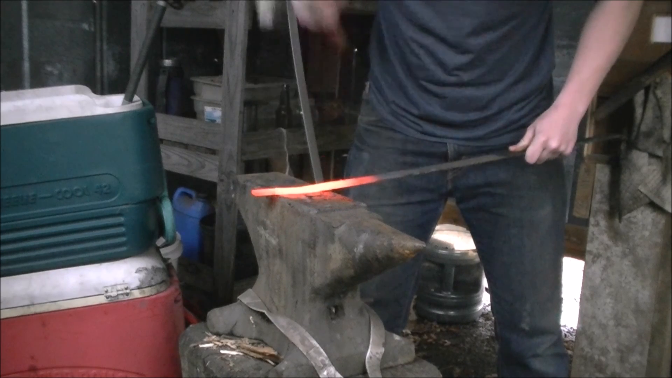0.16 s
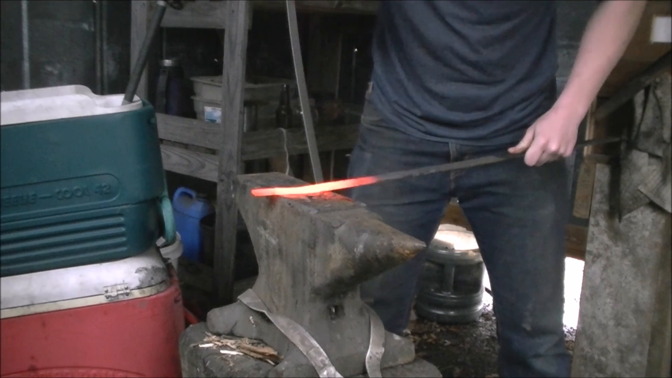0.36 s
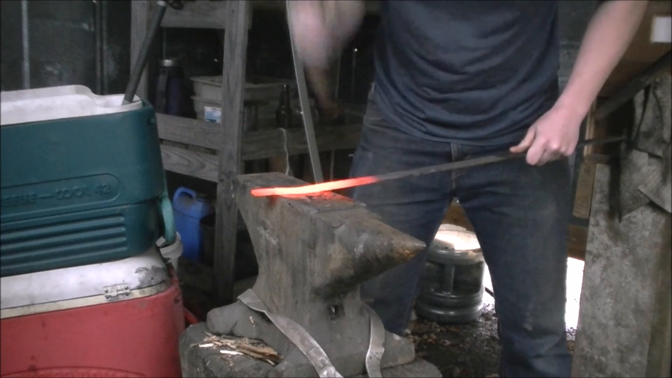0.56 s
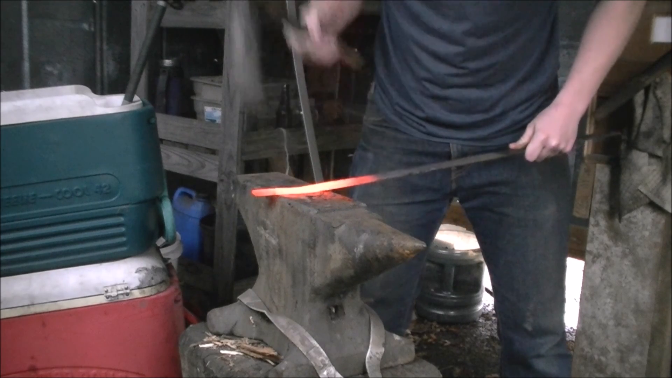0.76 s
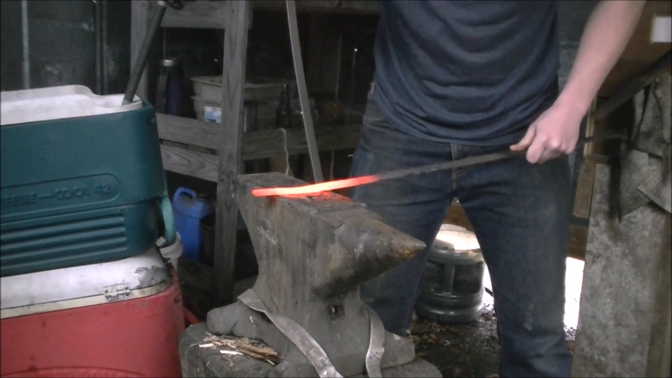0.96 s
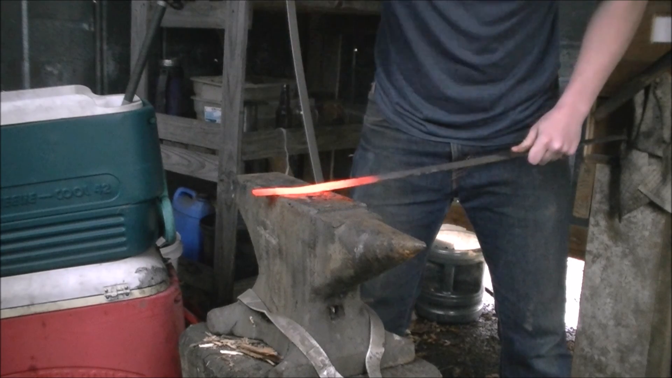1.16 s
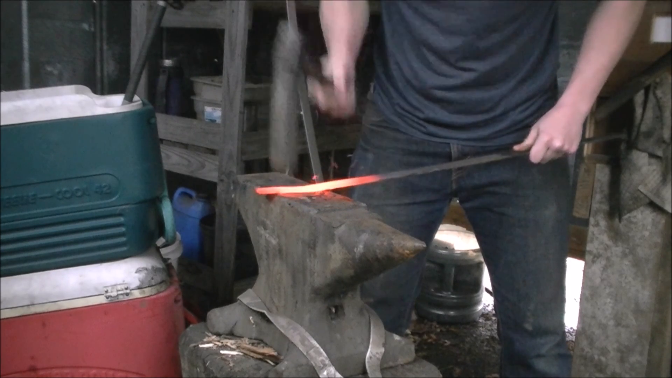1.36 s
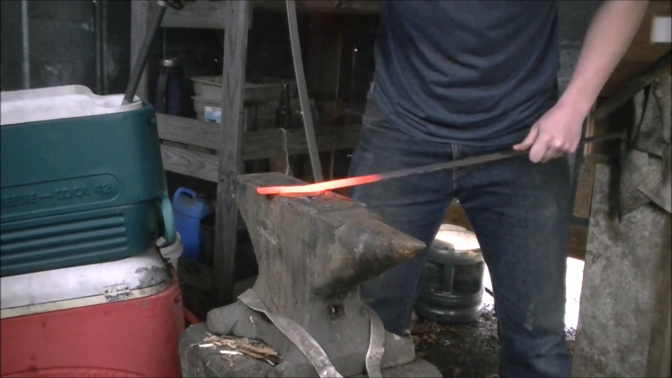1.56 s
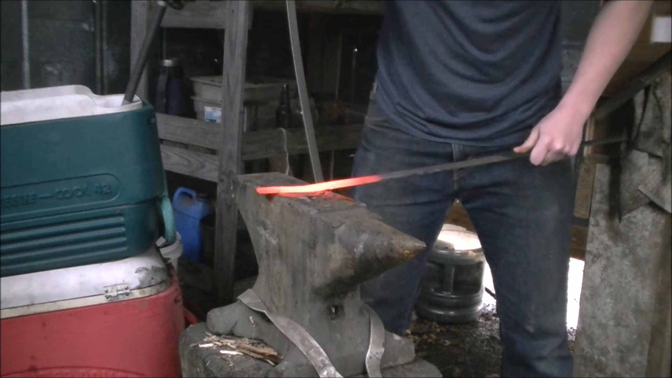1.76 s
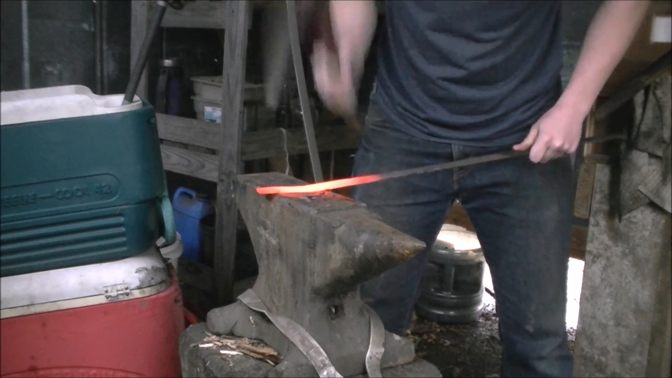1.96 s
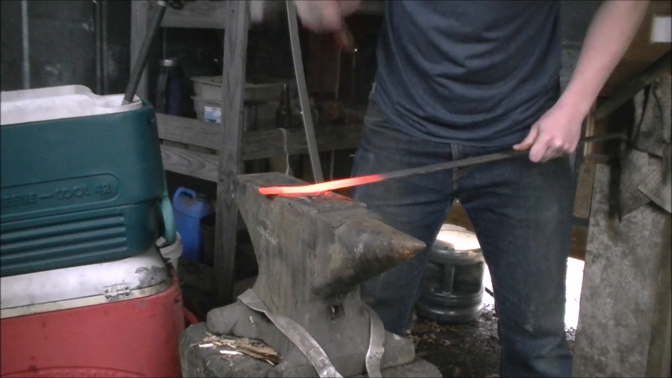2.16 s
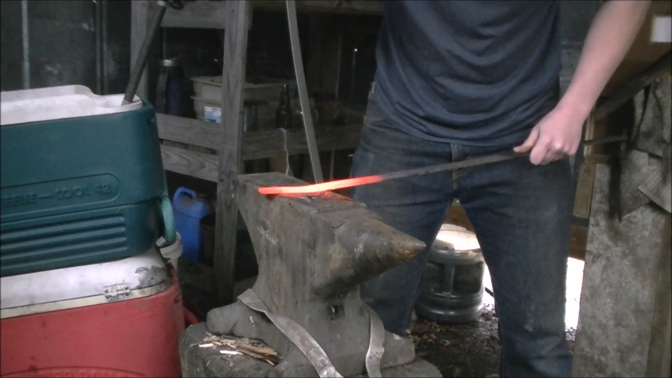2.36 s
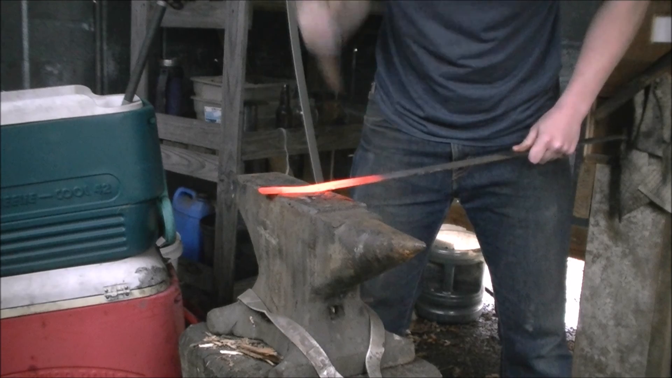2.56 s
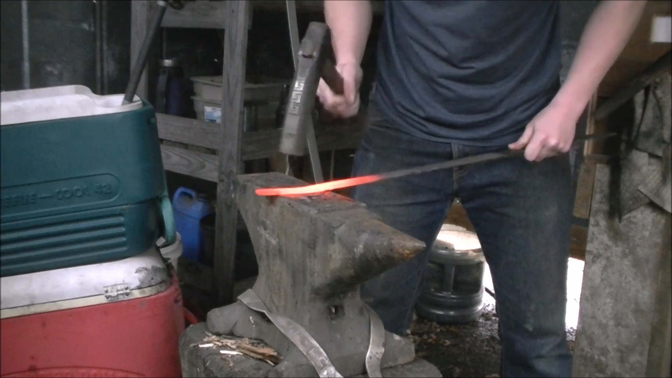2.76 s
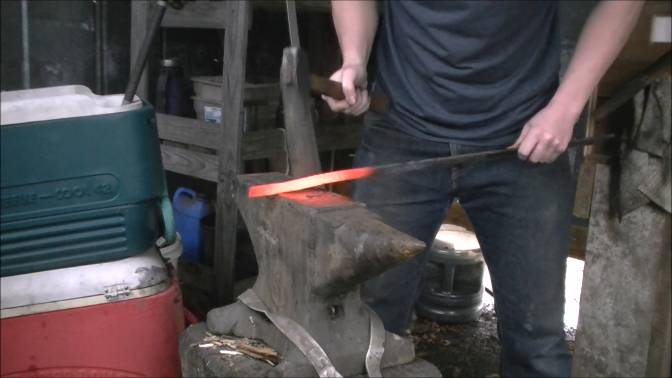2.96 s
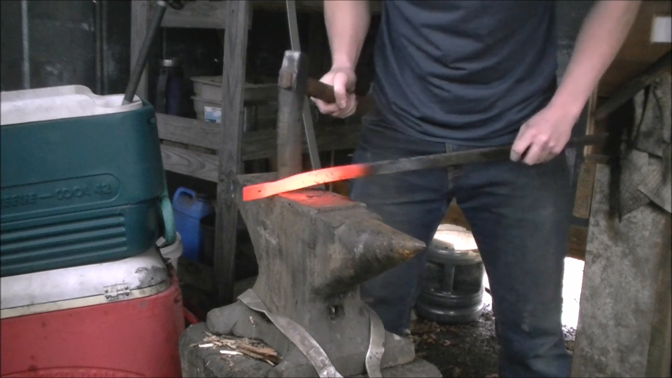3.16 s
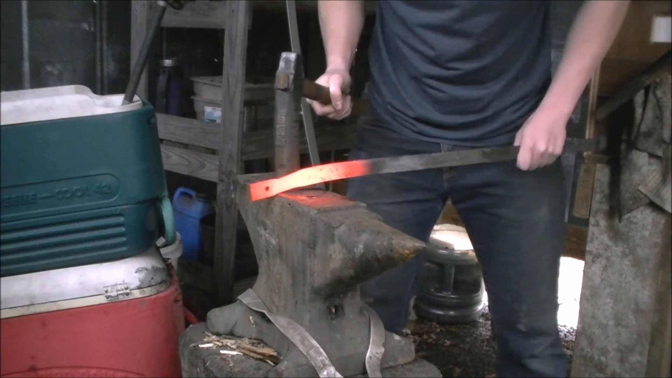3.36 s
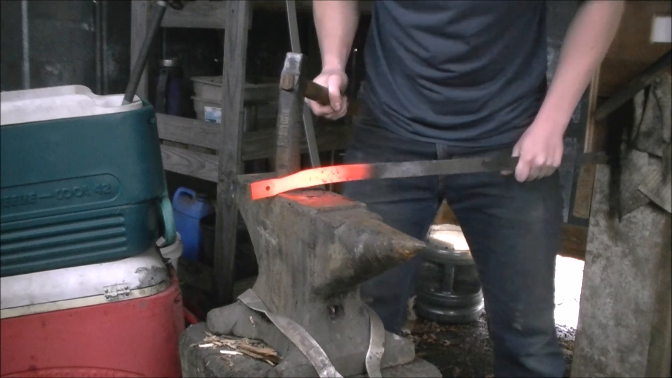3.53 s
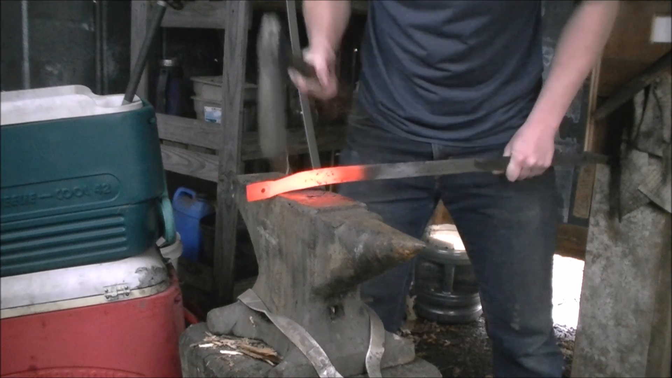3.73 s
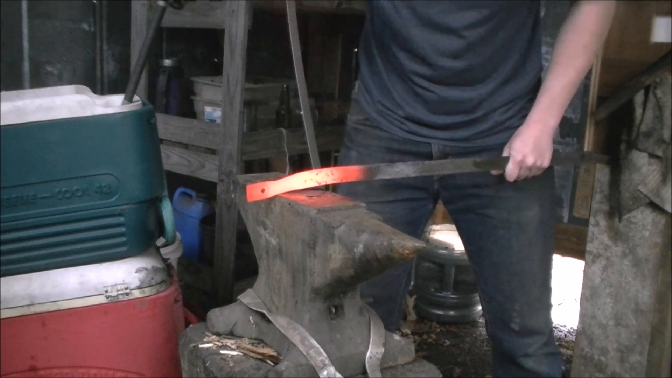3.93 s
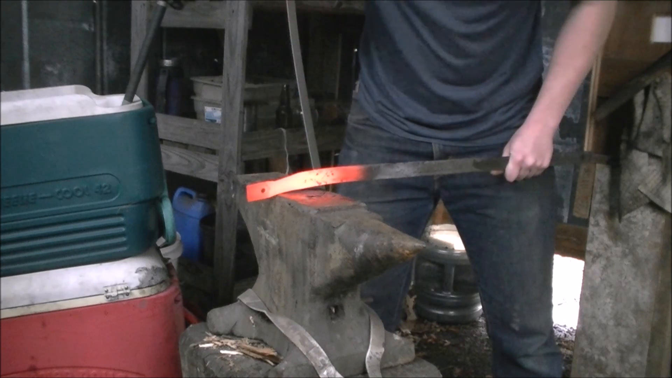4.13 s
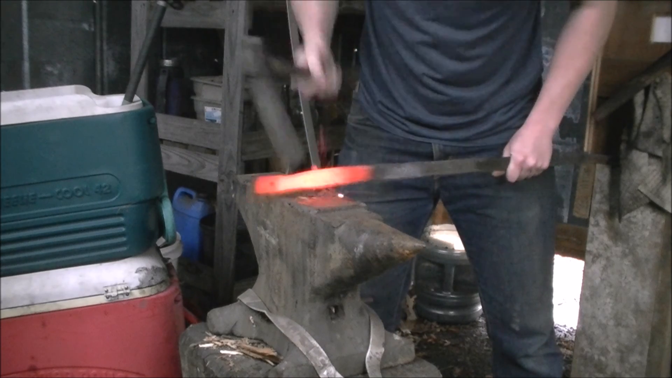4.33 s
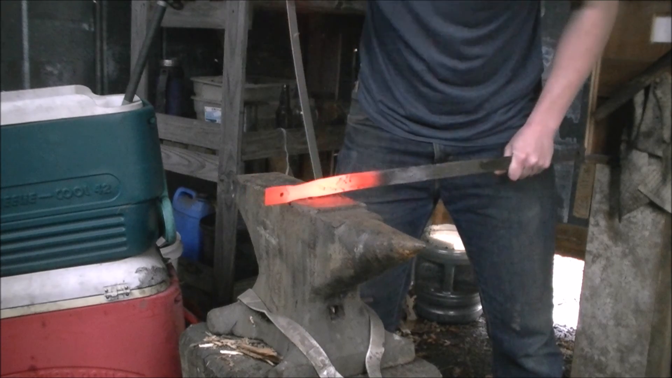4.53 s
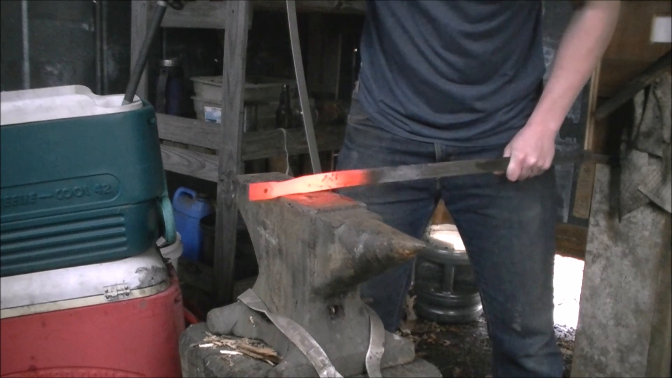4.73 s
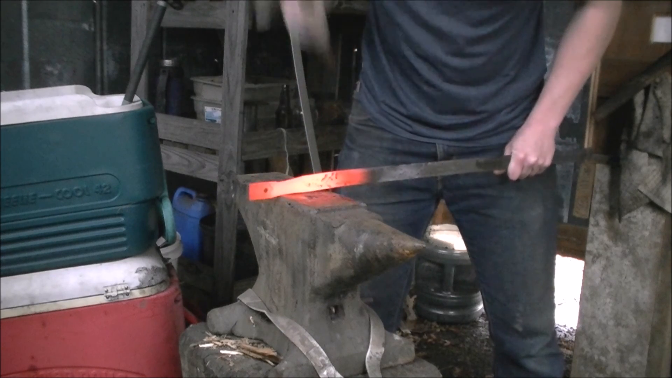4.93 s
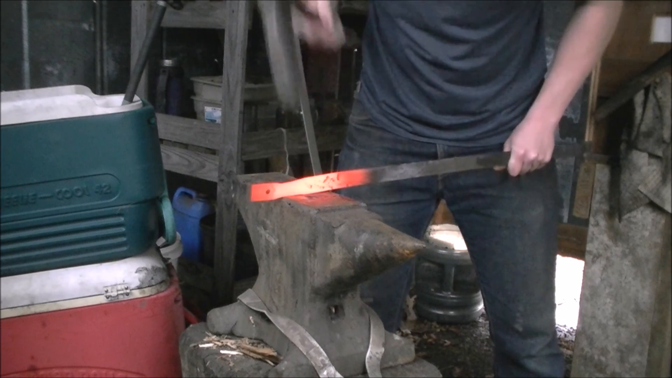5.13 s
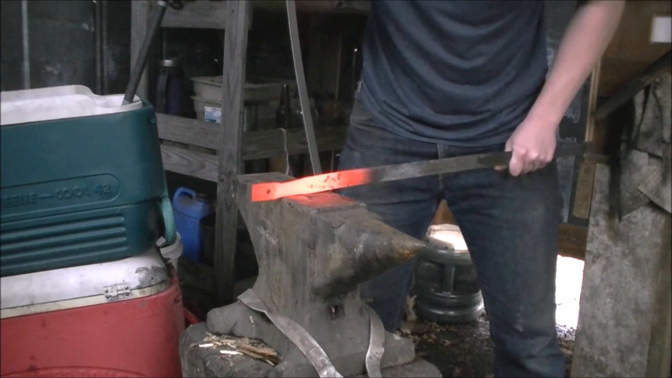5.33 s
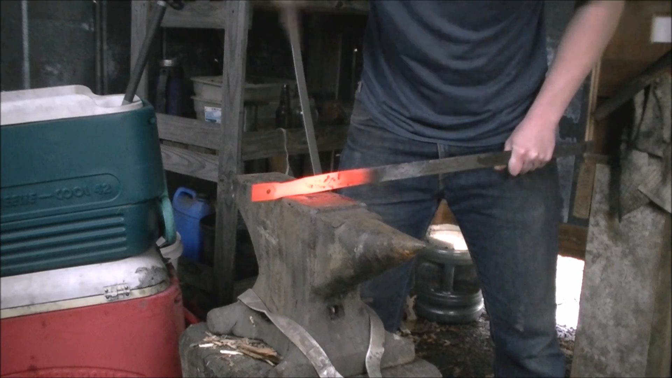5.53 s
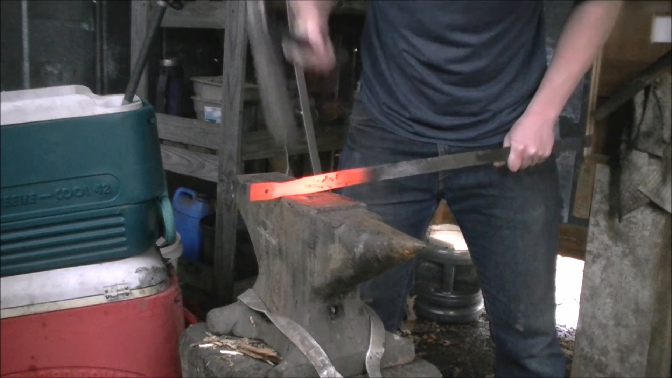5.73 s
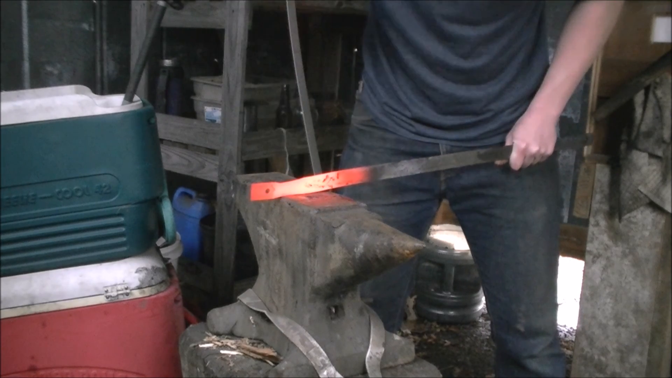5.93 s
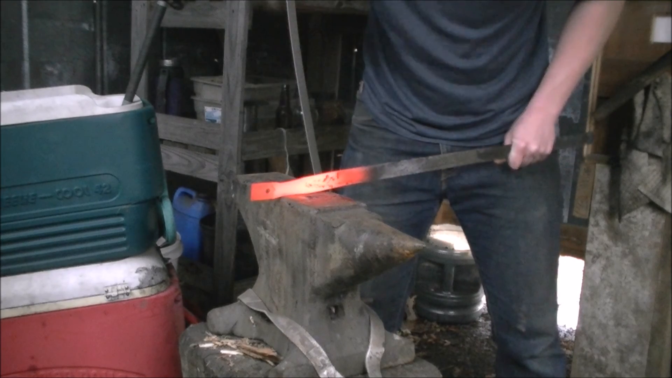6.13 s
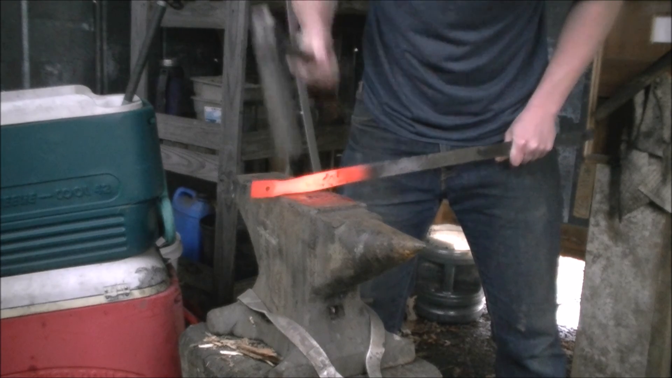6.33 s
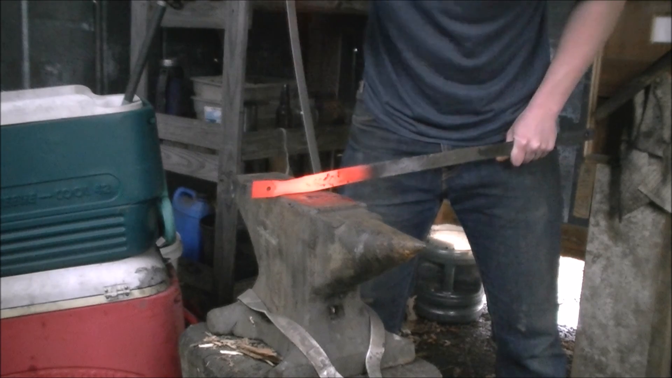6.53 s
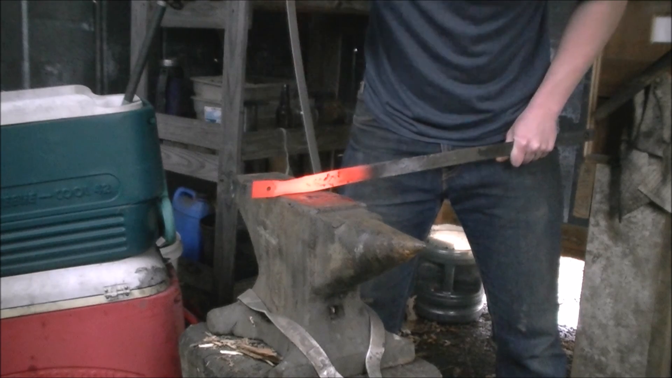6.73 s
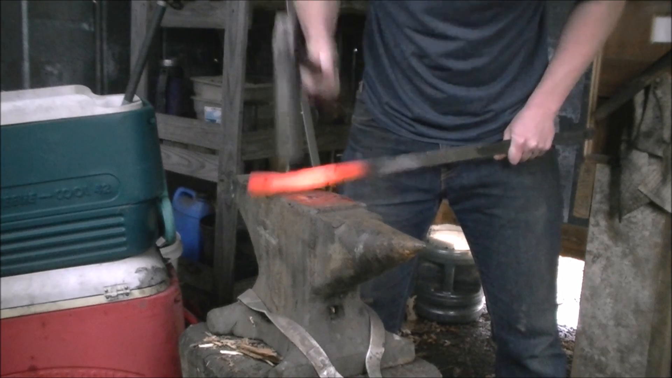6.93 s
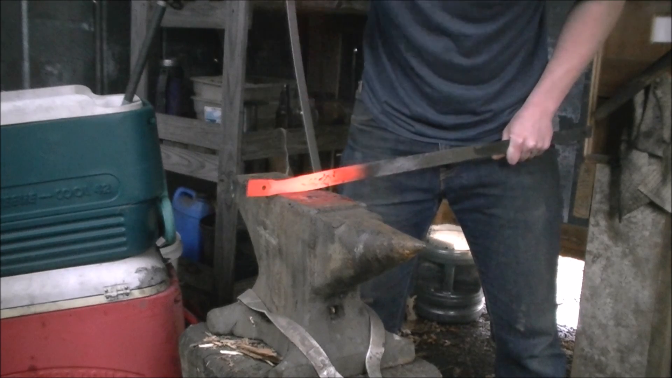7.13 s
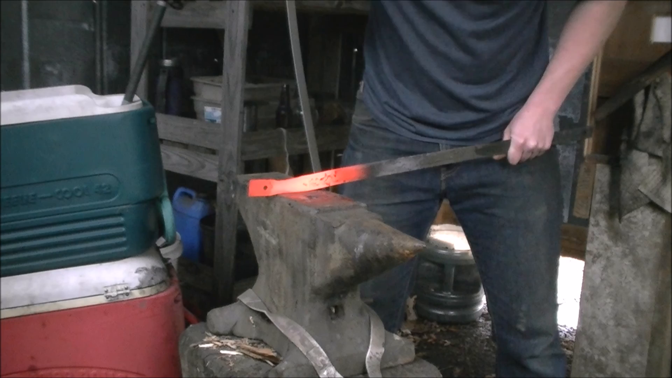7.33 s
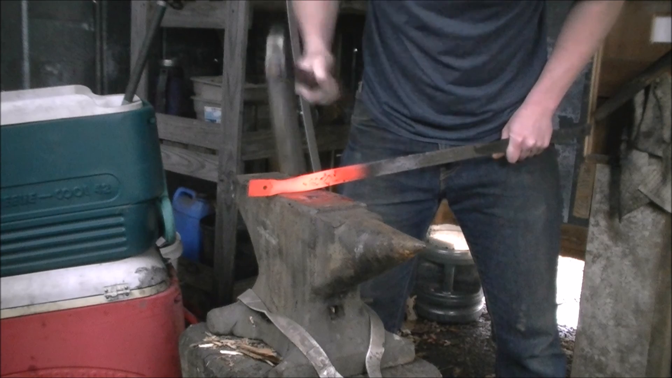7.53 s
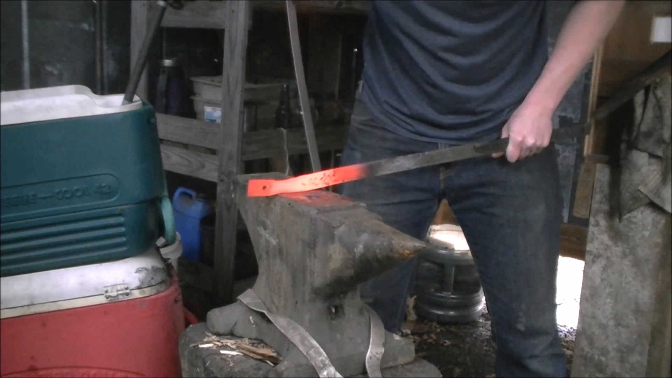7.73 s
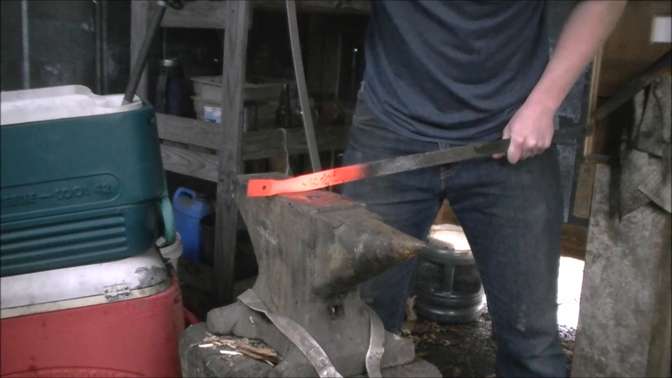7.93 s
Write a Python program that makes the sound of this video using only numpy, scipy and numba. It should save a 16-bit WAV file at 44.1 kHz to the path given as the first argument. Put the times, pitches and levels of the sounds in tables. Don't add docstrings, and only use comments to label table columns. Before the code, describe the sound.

Forging heard from a metre or two: sharp, slightly clipped hammer cracks with bright short steel ringing and a steady pitched hum between them. Heavy hits first, then light pinging taps and a pause of tiny ticks, then thuddier blows, one preceded by a soft metallic knock. Dense short echoes off boards, faint cloth swishes, a quiet forge murmur and a few muffled distant bangs.

```python
import sys
import numpy as np
from scipy import signal
from scipy.fft import rfft, irfft, next_fast_len
from scipy.io import wavfile
from scipy.ndimage import uniform_filter1d
from numba import njit

SR = 44100
rng = np.random.default_rng(int(sys.argv[2]) if len(sys.argv) > 2 else 0)


def transcribe(u):
    v = np.clip(np.atleast_2d(u).T, -1, 1)
    q = np.round(v * 32767).astype(np.int16)
    wavfile.write(sys.argv[1], SR, q)


def to_linear_factor(level_db):
    exponent = np.asarray(level_db, float) / 20
    return 10 ** exponent


N = 356769

# t/s, force level/dB, low tone level/dB, edge ring level/dB, face ring level/dB
BLOWS = [
    [(.003, -10, -26.5, 9, -5), (.658, -10, -27, 6, 9.5), (1.345, -5.5, -27, 8.5, 4),
     (2.022, -7, -29, 9.5, 7.5), (2.673, -12, -30, 5.5, 8)],
    [(2.952, -24.5, -35, 14.5, 11), (3.168, -25.5, -56.5, 14.5, 2.5), (3.264, -32, -44.5, 0, 2.5)],
    [(4.320, -17, -38.5, 3.5, 5.5), (5.021, -10.5, -25.5, -8, 0), (5.666, -11, -26.5, 2.5, 0.5),
     (6.299, -11.5, -27, 1.5, 3.5)],
    [(6.912, -7, -26, 8.5, -0.5), (7.548, -13.5, -27.5, -1.5, 3.5)],
]
# levels of flat bar/dB, bare steel/dB, hammer head/dB; tilt/(dB/octave); thud/dB, snap/dB
KINDS = [
    (-5, -10.5, 8, 1.5, -9, -5.5),
    (1.5, 8, -14.5, -2.5, -10.5, 3),
    (1.5, -20.5, 8.5, 1.28, -2.5, 0.5),
    (-7.5, -27.5, 4.5, 1.32, -3.5, 6.1),
]
TONE_HZ = [682.5, 682.5, 2047]
ANVIL_HZ = [
    [3867, 3886, 2333, 3880],
    [3666, 3700],
    [2208, 1547, 400, 2948],
]
BAR_HZ = [2933, 2112, 4731, 4875, 5775, 6320, 320, 6760, 3890]
HAMMER_HZ = [9068, 9140, 12010, 7140, 6945]
STUMP_HZ = [230, 256]
# level/dB, t60/s
TONE = [(0.5, 3.48), (0, 0.34), (-13.5, 1.48)]
ANVIL = [
    [(0.5, 0.26), (-11, .26), (-2.5, 0.22), (-7, .07)],
    [(-1, 0.37), (-8, 0.12)],
    [(-5, 0.6), (-13.5, 0.55), (-11, 0.29), (-11, 0.68)],
]
BAR = [(-5, .25), (-12, .36), (-12, .2), (-14, .2), (-15, .18), (-15, .14), (-7, .3), (0, .045), (15, .045)]
HAMMER = [(-5, 0.17), (-17.5, .2), (-17.5, 0.18), (-13.5, 0.22), (-20.5, 0.31)]
STUMP = [(-16, 0.61), (-14.5, 0.48)]
# f/Hz, level/(dB per Hz)
CRACK = [(40, -55), (80, -30.5), (240, -9.5), (500, -13.5), (900, -12.5), (2000, -21), (4000, -20),
         (6000, -23.5), (9000, -24), (11500, -39), (13500, -45), (16500, -75)]
# f/Hz, t60/s
SHED = [(60, 0.88), (120, 0.6), (250, 0.55), (700, 0.69), (1500, 0.39), (3000, 0.49), (6000, 0.45),
        (12000, 0.22)]
# f/Hz, side minus mid level/dB
SHED_SIDE = [(100, -18), (500, -15), (2000, -10), (5000, -9.5), (9000, -1.5), (14000, 6)]
# f/Hz, level/dB, t60/s
KNOCK = [(1410, 1, 0.21), (1690, 3, 0.14), (2050, -1, 0.45), (2450, 2.5, 0.29), (2800, 0, 0.34),
         (3250, -7, 0.3), (3900, -5, 0.29), (4740, -9, 0.16)]
# t/s, peak level/dB, centre f/Hz, t60/s
TICKS = [(.507, -49, 7100, 0.018), (0.578, -44, 4270, 0.077), (2.408, -45, 3640, 0.043),
         (3.452, -59, 5850, 0.026), (3.476, -51, 6500, 0.059), (3.512, -51, 9000, .04),
         (3.56, -51, 5500, 0.079), (3.585, -54, 5940, 0.174), (4.001, -66, 8360, .1),
         (4.111, -46.5, 6700, 0.11), (4.124, -50, 6200, 0.18), (4.184, -50.5, 4000, 0.077),
         (4.652, -32, 2480, 0.026), (4.901, -45, 5600, .03), (4.92, -50, 4460, 0.024),
         (4.968, -48, 3900, 0.13), (5.654, -38.5, 2580, 0.038), (6.158, -51, 6500, 0.24),
         (7.31, -48, 5300, 0.036), (7.497, -54, 4100, .05), (7.814, -44, 3900, 0.041)]
# t/s, peak level/dB, length/s
RUSTLE = [(0.34, -62.5, .3), (0.557, -57.5, 0.13), (1.016, -57, 0.27), (1.255, -63, 0.18),
          (1.819, -53.5, 0.49), (2.479, -56.5, 0.7), (3.557, -57, .4), (4.14, -59.5, 0.41),
          (4.596, -53.5, 0.35), (4.9, -50.5, 0.55), (5.55, -60, 0.2), (6.14, -58.5, 0.33),
          (6.82, -70, 0.17), (7.4, -57.5, 0.36), (7.85, -58.5, 0.92)]
# f/Hz, level/(dB per Hz)
CLOTH = [(2500, 2), (5000, -4), (8000, 2.5), (11000, -6), (15000, -6.5)]
# t/s, level/dB, rise/s, t60/s, tilt/(dB/octave)
BANGS = [
    (0.594, -39, 0.0088, 0.42, 0),
    (5.272, -16.5, 0.038, 0.77, -0.5),
    (6.211, -16, 0.045, 0.51, -0.5),
    (6.532, -17.5, 0.049, 0.65, -0.5),
]
# f/Hz, level/(dB per Hz)
BANG = [(47, -49.5), (80, -30), (355, -9), (562, -9), (684, -11), (747, -3.5), (1130, -4), (8490, -13),
        (12000, -22), (15000, -32.5)]
# f/Hz, level/(dB per Hz)
FORGE = [(15, -71), (25, -26.5), (59, 13.5), (175, 5.5), (277, 7), (363, 4.5), (463, 3), (840, 7.5),
         (1020, 5.5), (3250, -13.5), (5000, -19), (12500, -64), (16000, -36)]
# f/Hz, level/dB
MIC = [(20, -24), (45, -6), (100, 0), (11500, 0), (14000, -8), (16500, -34)]

CRACK_S, CRACK_DB, RING_DB = 0.0036, 13, -1
SNAP_TILT_DB = 2
SNAP_SIDE_DB, SNAP_SIDE_TILT_DB = -24.5, 5.5
STEADY = 0.6
CLANG_DB, CLANG_T60_S = -9.5, 0.26
SHED_DB, SHED_RISE_S = 7.5, 0.0015
KNOCK_S, KNOCK_DB = 4.652, -35
STILL_DB, SWISH_FALL_DB = -68, 7.5
FORGE_DB, FORGE_SIDE_DB = -49.5, -6.5
HOLD_DB, ATTACK_S, RELEASE_S, RATIO = -15.5, 0.0022, 0.025, 5.0
CLIP = 0.66


def noise(*shape):
    return rng.standard_normal(shape)


def level(x, db):
    return x * to_linear_factor(db) / np.sqrt(np.mean(x ** 2))


def read(table, hz):
    f, value = np.transpose(table)
    return np.interp(np.log(hz + 1), np.log(f), value)


def colour(x, table, tilt_db=0):
    size = next_fast_len(x.shape[-1])
    hz = np.fft.rfftfreq(size, 1 / SR)
    db = read(table, hz) + tilt_db * np.log2((hz + 1) / 1000)
    return irfft(rfft(x, size) * to_linear_factor(db), size)[..., :x.shape[-1]]


def fade(t, t60):
    return np.exp(-np.log(1000) * t / t60)


def stereo(mid, side, side_db):
    return mid + to_linear_factor(side_db) * side * np.array([[1], [-1]])


def walk(rate):
    k = int(SR / rate)
    return uniform_filter1d(np.repeat(noise(N // k + 1), k), k)[:N]


def add(out, x, s):
    i = int(s * SR)
    out[..., i:i + x.shape[-1]] += x[..., :N - i]


def blows():
    return np.transpose([blow + shared for kind, shared in zip(BLOWS, KINDS) for blow in kind])


def cracks():
    snap, burst = np.zeros((2, N)), np.zeros(N)
    t = np.arange(1024) / SR
    grits = noise(blows().shape[1], 1024)
    for (s, db, *_, tilt, thud_db, snap_db), grit in zip(blows().T, grits):
        tilt = np.clip(tilt, -8, 3)
        direct = colour(np.array([grit, grit[::-1]]), CRACK, tilt + SNAP_TILT_DB)
        mid, side = level(direct, db + snap_db + CRACK_DB) * np.exp(-t / CRACK_S)
        side = colour(side, [(1, 0), (2, 0.0036)], SNAP_SIDE_TILT_DB)
        add(snap, stereo(mid, side, SNAP_SIDE_DB), s)
        even = rfft(grit * np.exp(-t / CRACK_S))
        even = colour(irfft(even / abs(even)), [(350, thud_db), (700, 0.049)])
        add(burst, level(colour(even, CRACK, tilt), db + CRACK_DB - 20.5), s)
    return snap, burst


def ring(modes_hz, modes, blow_db, scatter_db=1.37, rough=0.95):
    s, t = blows()[0], np.arange(N) / SR
    last = np.maximum(np.searchsorted(s, t) - 1, 0)
    since = np.maximum(t - s[last], 0)
    out = 0
    for hz, (db, t60) in zip(modes_hz, modes):
        chance = noise(len(s), 2)
        start_db = blow_db + db + scatter_db * chance[:, 0]
        pitch = hz * (1 + 0.0006 * chance[:, 1])
        size = to_linear_factor(np.float32(start_db[last] - 60 * since / t60))
        phase = np.float32(2 * np.pi * (pitch[last] * since % 1))
        waver = rough * walk(25 + hz / 60)
        out = out + size * ((STEADY + waver) * np.sin(phase) + waver[::-1] * np.cos(phase))
    return out * np.minimum(since / 0.0006, 1)


def clang(burst, count=110):
    t = np.arange(8192) / SR
    place, size = rng.random((2, count, 1))
    hz = 1800 + 10000 * place ** 1.5
    modes = np.sum(to_linear_factor(-12 * size) * np.sin(2 * np.pi * hz * t), axis=0) * fade(t, CLANG_T60_S)
    modes = modes / np.sqrt(np.sum(modes ** 2))
    return burst + to_linear_factor(CLANG_DB) * signal.oaconvolve(burst, modes)[:N]


def shed(x):
    t = np.arange(SR) / SR
    spectrum, hz = rfft(noise(2, SR)), np.fft.rfftfreq(SR, 1 / SR)
    echoes = 0
    for centre in 62.5 * 2 ** np.arange(9):
        share = np.clip(1 - abs(np.log2((hz + 1) / centre)), 0, 1)
        echoes = echoes + irfft(spectrum * share, SR) * fade(t, read(SHED, centre))
    echoes = echoes * (1 - np.exp(-t / SHED_RISE_S))
    echoes = echoes / np.sqrt(np.sum(echoes ** 2, axis=1, keepdims=True))
    mid, side = signal.fftconvolve(x[None], echoes, axes=1)[:, :N]
    return to_linear_factor(SHED_DB) * stereo(mid, colour(side, SHED_SIDE), 0)


def knock():
    out, t = np.zeros(N), np.arange(SR // 2) / SR
    modes = 0
    for hz, db, t60 in KNOCK:
        rattle = 0.4 + 0.56 * walk(140.0)[:len(t)]
        modes = modes + to_linear_factor(KNOCK_DB + db) * fade(t, t60) * np.sin(2 * np.pi * hz * t) * rattle
    add(out, modes * np.minimum(t / 0.006, 1), KNOCK_S)
    return out


def ticks():
    out, t = np.zeros((2, N)), np.arange(8192) / SR
    for s, db, hz, t60 in TICKS:
        click = colour(noise(2, 8192), [(hz / 3, -26), (hz, 0), (hz * 1.8, -18)])
        mid, side = level(click, db) * fade(t, t60)
        add(out, stereo(mid, side, -8.5), s)
    return out


def rustle():
    t = np.arange(N) / SR
    power = to_linear_factor(2 * STILL_DB)
    for s, db, length in RUSTLE:
        power = power + to_linear_factor(2 * (db - SWISH_FALL_DB * (2 * (t - s) / length) ** 2))
    mid, side = level(colour(noise(2, N), CLOTH), 0) * np.sqrt(power) * to_linear_factor(2.0 * walk(40))
    return stereo(mid, side, -1.5)


def bangs():
    out, t = np.zeros((2, N)), np.arange(SR) / SR
    for s, db, rise, t60, tilt in BANGS:
        air = level(colour(noise(2, SR), BANG, tilt), db)
        low = signal.sosfilt(signal.butter(1, 2000, fs=SR, output="sos"), air)
        air = low * fade(t, t60) + (air - low) * fade(t, 0.37 * t60)
        mid, side = air * np.minimum(t / rise, 1) ** 0.83
        add(out, stereo(mid, side, -9.5), s)
    return out


def forge():
    air = level(colour(noise(2, N), FORGE), FORGE_DB)
    low = signal.sosfilt(signal.butter(1, 400, fs=SR, output="sos"), air)
    mid, side = low * to_linear_factor(1.2 * walk(2.2)) + (air - low) * to_linear_factor(0.4 * walk(18))
    return stereo(mid, side, FORGE_SIDE_DB)


def scene():
    _, blow, tone, *spot, _, thud, _ = blows()
    *anvil, bar, hammer = np.array(spot) + blow + RING_DB - 4.5
    steel = sum(map(ring, ANVIL_HZ, ANVIL, anvil))
    steel = steel + ring(BAR_HZ, BAR, bar) + ring(HAMMER_HZ, HAMMER, hammer)
    steel = steel + ring(STUMP_HZ, STUMP, blow + thud + RING_DB)
    song = ring(TONE_HZ, TONE, tone, scatter_db=0, rough=0.04) / STEADY
    snap, burst = cracks()
    direct = snap + stereo(steel, np.gradient(steel), -12)
    heard = direct + shed(clang(burst) + to_linear_factor(-11.0) * steel)
    near = to_linear_factor(-0.5) * heard + stereo(song, song, -25.5) + knock()
    return near + bangs() + ticks() + rustle() + forge()


@njit
def follow(x, attack, release):
    e, y = 0., np.empty(len(x))
    for i in range(len(x)):
        e += (x[i] - e) * (attack if x[i] > e else release)
        y[i] = e
    return y


def band_limit(x):
    return signal.sosfilt(signal.butter(12, 16720, fs=SR, output="sos"), x)


def record(dry):
    loud = np.abs(dry).max(axis=0)
    for _ in range(2):
        loud = follow(loud, 1 / (ATTACK_S * SR), 1 / (RELEASE_S * SR))
    gain = np.minimum(to_linear_factor(HOLD_DB) / (loud + 1e-9), 1) ** (1 - 1 / RATIO)
    clipped = CLIP * np.tanh(dry * gain / CLIP)
    return band_limit(colour(clipped, MIC))


dry = scene()
out = record(dry)
transcribe(out)
```